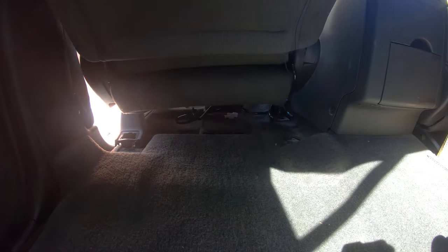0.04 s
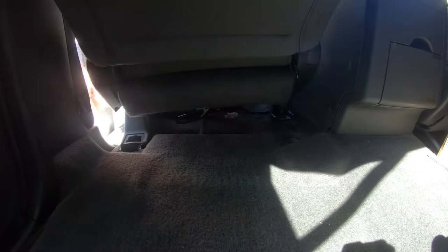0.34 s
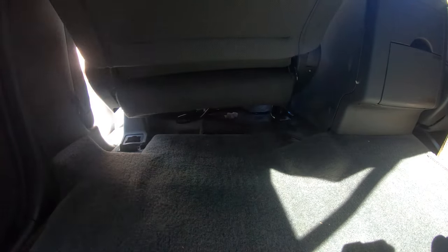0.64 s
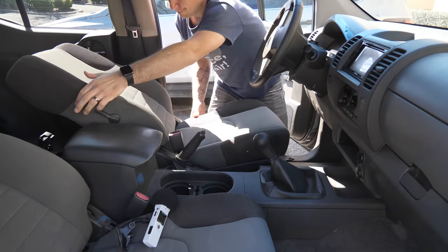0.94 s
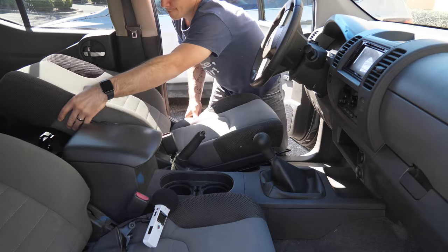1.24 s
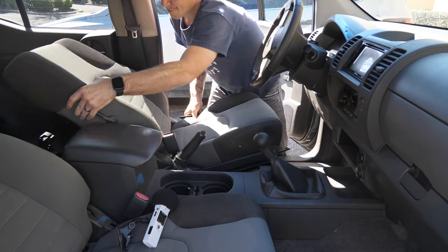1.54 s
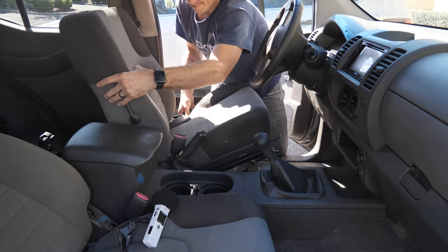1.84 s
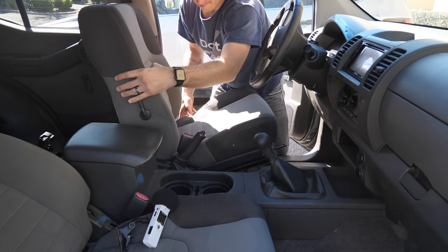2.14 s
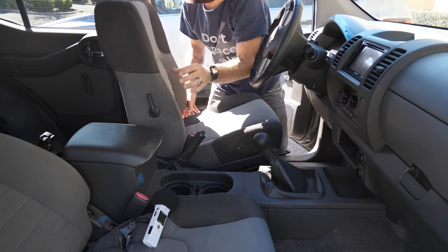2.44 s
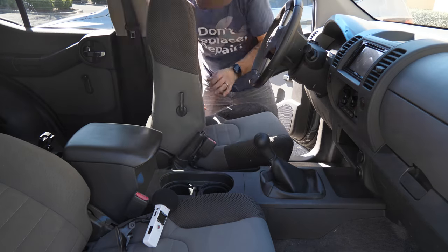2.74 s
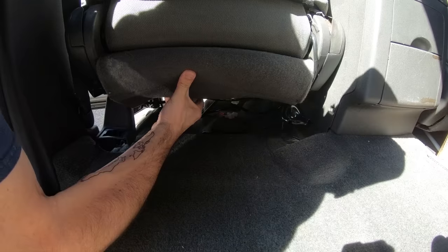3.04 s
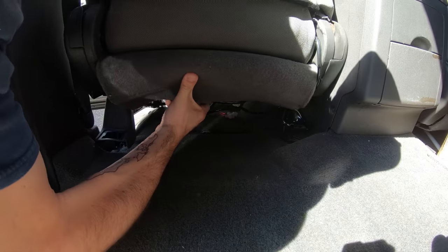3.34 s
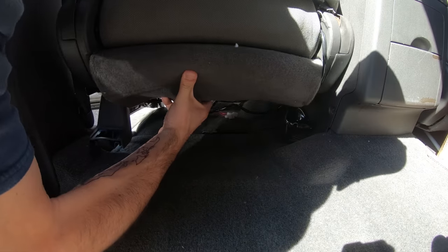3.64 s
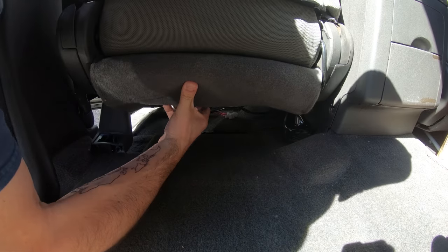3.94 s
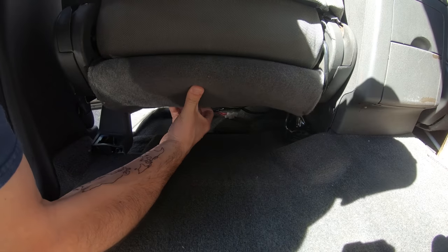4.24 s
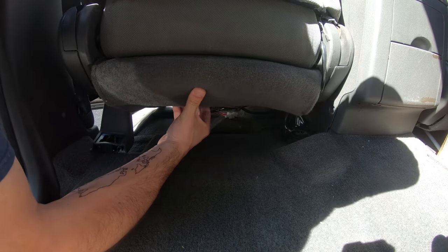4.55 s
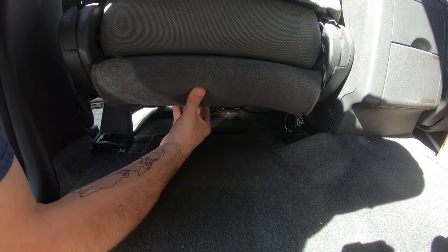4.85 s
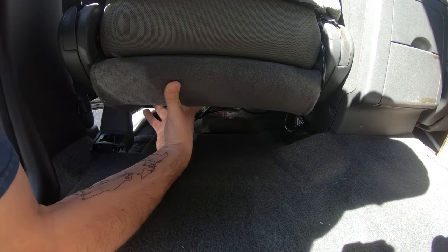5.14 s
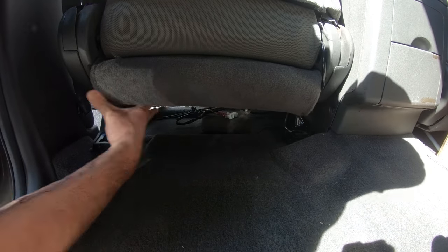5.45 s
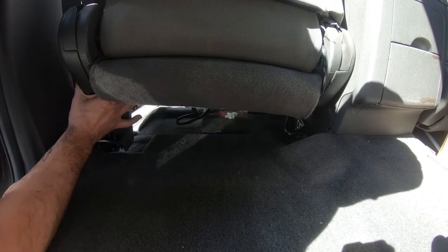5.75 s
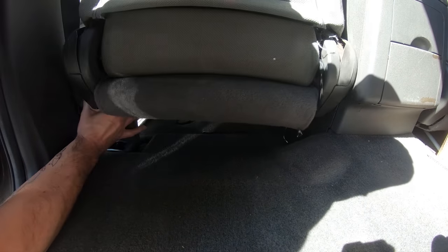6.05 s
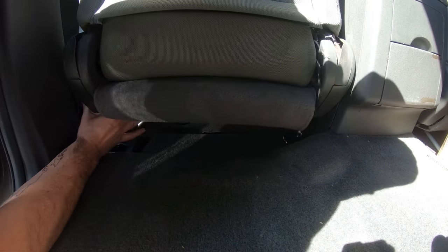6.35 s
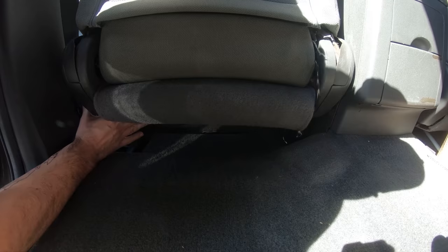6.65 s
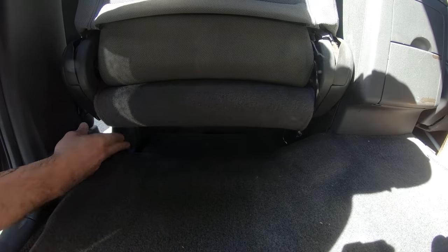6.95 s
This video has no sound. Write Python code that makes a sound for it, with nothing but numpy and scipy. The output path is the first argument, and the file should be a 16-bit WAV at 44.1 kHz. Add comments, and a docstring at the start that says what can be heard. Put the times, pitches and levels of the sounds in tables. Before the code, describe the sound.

A car seat knocks and thumps irregularly with rustling upholstery, then scrapes along its rail and stops with a loud metallic squeal.

```python
"""A car seat knocks on its floor rails as it is rocked and shoved into place, heard inside the parked car.
Impacts excite the resonances of the steel frame, and pushes on the floor set the cabin's air modes booming.
Stick-slip friction makes the seat judder along its rail and stop with a ringing squeal that overloads the
microphone. Upholstery rustles and groans once under a hand; the street murmurs through the open door."""
import sys
import numpy as np
from scipy import signal
from scipy.fft import rfft, irfft, next_fast_len
from scipy.io import wavfile
from scipy.ndimage import uniform_filter1d

SR = 44100
rng = np.random.default_rng(int(sys.argv[2]) if len(sys.argv) > 2 else 0)


def unload_audio(sound):
    """Save the sound as a 16-bit wav file, at the path given as the first command line argument."""
    columns = np.transpose(np.atleast_2d(sound))
    # keep every value between -1 and 1, then stretch to whole-number steps
    steps = np.round(np.clip(columns, -1, 1) * 32767)
    wavfile.write(sys.argv[1], SR, steps.astype(np.int16))


N = 312678
TIME = np.arange(N) / SR


# impacts: t/s, level/dB, hardness (0 padded, 1 bare steel), seat pan f/Hz, clack f/Hz, chatter length/s
IMPACTS = [(0.163, -32, 0.18, 305, 1300, 0.019), (0.279, -24.5, 0.37, 557, 1360, 0.019),
           (0.423, -37.5, 0.84, 310, 2090, 0.012), (0.461, -36.5, 0.7, 287, 1990, 0.018),
           (0.686, -39, 0.26, 620, 1300, 0.011), (0.881, -35.5, 0.65, 1700, 1730, 0.023),
           (0.927, -33, 0.68, 1590, 1760, 0.013), (1.223, -26, 1, 513, 1240, 0.011),
           (1.461, -31.5, 0.47, 670, 1500, 0.016), (1.538, -21, 0.35, 224, 1880, 0.016),
           (1.67, -25.5, 0.08, 294, 1280, 0.015), (1.688, -16.5, 0.1, 292, 2090, 0.013),
           (1.783, -16.5, 0.53, 825, 2690, 0.014), (1.976, -26.5, 0.93, 990, 2750, 0.017),
           (2.706, -43.5, 0.86, 360, 2070, 0.014), (2.745, -14, 0.032, 303, 1240, 0.011),
           (2.825, -18, 0.87, 455, 3120, 0.029), (3.167, -24, 0.04, 225, 1100, 0.014),
           (4.092, -50.5, 1, 436, 2700, 0.001), (4.165, -38.5, 0.05, 495, 1300, 0.015),
           (4.471, -32.5, 0.43, 220, 1300, 0.013), (4.528, -16, 0.08, 430, 1480, 0.0079),
           (4.54, -17, 0.15, 616, 1400, 0.011), (4.972, -41.5, 0.58, 342, 2260, 0.01),
           (5.057, -32, 0.78, 875, 2480, 0.0054)]
# spectra of the seat pan's thud, the frame's clack and the edges' tick: f/Hz, level/dB
THUD_SPECTRUM = [(50, -38), (110, 2), (220, -3.5), (450, -2), (850, -3.5), (1200, -10), (1800, -27),
                 (4000, -47)]
CLACK_SPECTRUM = [(600, -22), (1200, 4), (1900, 5), (2900, 1), (3600, -3.5), (5000, -12), (8000, -29)]
TICK_SPECTRUM = [(2500, -1), (4800, 3), (7000, -6), (11000, -9.5), (15500, -35)]

def knocks():
    """Impact excitation: the harder the contact, the more clack and tick join the seat pan's thud."""
    out = np.zeros((2, N))
    for start, db, hardness, pan_hz, clack_hz, chatter_s in IMPACTS:
        padding = np.clip(1 - hardness, 0, 1)
        clack_db = -0.5 - 19.5 * padding ** 1.55
        tick_db = -2 - 41 * padding
        thud = struck_part(THUD_SPECTRUM, pan_hz, chatter_s, lift_db=11, t60=0.12, per_s=5000)
        clack = struck_part(CLACK_SPECTRUM, clack_hz, chatter_s, lift_db=10, t60=0.083, per_s=5000)
        tick = struck_part(TICK_SPECTRUM, 12200, 0.87 * chatter_s, lift_db=1.5, t60=0.063, per_s=3500)
        add(out, start, amp(db) * (thud + amp(clack_db) * clack + amp(tick_db) * tick))
    return out


def struck_part(spectrum, peak_hz, chatter_s, lift_db, t60, per_s, rise_s=0.0018, peak_octaves=0.14):
    """Damped response of a resonant part to a chatter of contacts; rms 1 over its first 20 ms."""
    def colour_db(hz):
        detuning = np.log2((hz + 1) / peak_hz) / peak_octaves
        return read(spectrum, hz) + frame_db(hz) + lift_db / (1 + detuning ** 2)
    t = np.arange(16384) / SR
    attack = 1 - np.exp(-t / rise_s)
    decay = amp(-60 * np.maximum(t - chatter_s, 0) / t60)
    cabin_tail = amp(-30 - 60 * t / 0.54)
    sound = stereo(grains(len(t), per_s, spread_db=0.5), colour_db) * attack * (decay + cabin_tail)
    return sound / np.sqrt(np.mean(sound[:, :SR // 50] ** 2))


# resonances of the seat frame: f/Hz, bandwidth/Hz, lift/dB
FRAME_MODES = [(220, 19, 8.5), (326, 25, 5), (443, 27, 5.5), (616, 22, 3.5), (860, 35, 0), (1104, 97, 4.5),
               (1470, 120, 1.5), (2040, 113, 0.5), (2720, 60, -1), (3270, 170, 2.5), (4700, 380, 1)]

def frame_db(hz):
    """Resonance: each mode of the frame shapes the spectrum in a band about its natural frequency."""
    return sum(db / (1 + (2 * (hz - f) / width) ** 2) for f, width, db in FRAME_MODES)


# weight landing on the floor: t/s, relative level/dB, push length/s
FLOOR_PUSHES = [(0.399, -24, 0.0093), (0.477, -21.5, 0.014), (0.74, -30.5, 0.017), (1.492, -20.5, 0.015),
                (1.547, -17.5, 0.0076), (2.774, -24, 0.0098), (2.832, -14, 0.0058), (3.375, -16.5, 0.017),
                (3.406, -16, 0.02), (3.637, -24, 0.016), (3.883, -26.5, 0.012), (4.366, -25, 0.011),
                (4.469, -20, 0.0077), (4.538, -12, 0.0082), (4.774, -24.5, 0.023), (5.761, -22, 0.014),
                (6.059, -11, 0.0046), (6.325, -27, 0.021)]
# air modes of the cabin: f/Hz, relative level/dB, reverberation time/s
CABIN_MODES = [(34.2, 5.5, 0.58), (53, -9.5, 0.6), (67.9, 1.5, 0.31), (89.4, 0.5, 0.23), (121, 3, 0.17)]

def cabin_booms(detune=0.041, phase_spread_rad=0.71):
    """Modal response: a push on the floor rings the cabin's air; a shorter push reaches higher modes."""
    out, t = np.zeros((2, N)), np.arange(SR) / SR
    for start, db, push_s in FLOOR_PUSHES:
        modes = np.zeros((2, SR))
        for hz, mode_db, t60 in CABIN_MODES:
            mode_hz = hz * (1 + detune * rng.standard_normal())
            phase = phase_spread_rad * rng.standard_normal((2, 1))
            modes += amp(mode_db - 60 * t / t60) * np.sin(2 * np.pi * mode_hz * t + phase)
        push = np.sin(np.pi * np.minimum(t / push_s, 1)) ** 2
        add(out, start, amp(db - 2) * signal.fftconvolve(modes, push[None] / push.sum(), axes=1))
    # the open door lets the slowest pressure swings escape
    door_leak = signal.butter(2, 22, "high", fs=SR, output="sos")
    return signal.sosfilt(door_leak, out) * pan(-2.6)


# shoves along the rail: t/s, length/s, top level/dB
RAIL_SHOVES = [(5.73, 0.077, -9.5), (6.006, 0.018, -9.5)]
# spectrum of the sliding runner: f/Hz, level/dB
JUDDER_SPECTRUM = [(80, -7.5), (260, -6.5), (380, -7), (460, 7.5), (560, -1), (800, -7), (1100, -15.5),
                   (1500, -22.5), (2600, -25.5), (3600, -42), (9000, -58.5)]

def judder(slips_per_s=78, slip_decay_cycles=0.83, growth_db=16.5):
    """Relaxation oscillation: the runner sticks and slips, and every slip shakes the seat pan."""
    slip_phase = cycles(slips_per_s, jitter=0.25, rate_hz=40) % 1
    slips = 0.55 + np.exp(-slip_phase / slip_decay_cycles)
    contacts = grains(N, 9000, spread_db=-0.5) * slips
    scrape = stereo(contacts, lambda hz: read(JUDDER_SPECTRUM, hz) + 0.5 * frame_db(hz))
    running_rms = np.sqrt(uniform_filter1d((scrape ** 2).mean(0), size=700) + 1e-6)
    speed = np.zeros(N)
    for start, length, db in RAIL_SHOVES:  # the runner breaks loose, gathers speed, then coasts to rest
        remaining = np.clip(1 - (TIME - start) / length, 0, 1)
        speed += amp(db - growth_db * remaining) * gate(start, length, attack_s=0.013, fall_db_per_s=306)
    return speed * scrape / running_rms


SQUEAL_HZ = 296.2
# steel rubbing steel, at the stop and as the seat springs back: t/s, length/s, level/dB
STEEL_RUBS = [(6.016, 0.045, -0.96), (6.17, 0.056, -30)]
# harmonics of the squeal: number, driven level/dB, ringing level/dB, driven left minus right/dB
SQUEAL_HARMONICS = [(1, -23, -56, 0), (2, -8, -34.5, 5), (3, -1.5, -29, 1), (4, -10, -28, -1.5),
                    (5, -10.5, -37.5, -4.5), (6, -19.5, -56, -1), (7, -26.5, -51, -2), (8, -29, -41, -2),
                    (9, -25.5, -44.5, -1), (10, -24, -50, 3), (11, -22.5, -54, -4), (12, -23.5, -49, -1),
                    (14, -29.5, -61, -2)]
# spectrum of the grit between the faces: f/Hz, level/dB
GRIT_SPECTRUM = [(100, -11), (350, 8), (1200, -0.5), (3300, -15), (5500, -10.5), (11000, -16.5),
                 (15500, -27)]

def squeal(ring_start_s=6.04, ring_t60=0.99, grit_db=-16.5):
    """Self-excited vibration: fast stick-slip locks onto a steel part, which then rings on unevenly."""
    driven_cycles = cycles(SQUEAL_HZ, jitter=0.01, rate_hz=86)
    free_cycles = cycles(SQUEAL_HZ, jitter=0.00498, rate_hz=25.5)
    force = sum(amp(db) * gate(start, length, attack_s=0.016, fall_db_per_s=557)
                for start, length, db in STEEL_RUBS)
    ring_age = np.maximum(TIME - ring_start_s, 0)
    ring = (1 - np.exp(-ring_age / 0.01)) * amp(-60 * ring_age / ring_t60)
    tone = np.zeros((2, N))
    for k, driven_db, ring_db, pan_db in SQUEAL_HARMONICS:
        # higher harmonics lock more loosely and differ more between left and right
        offset = rng.random() + 0.058 * np.log(k) * wander(41)
        offset = offset + 0.019 * k * rng.uniform(-0.35, 1, (2, 1))
        driven_gain = force * amp(driven_db + 1.25 * np.log(k) * wander(45))
        ring_gain = ring * amp(ring_db + 4 * wander(25))
        tone += pan(pan_db) * driven_gain * np.sin(2 * np.pi * (k * driven_cycles + offset))
        tone += ring_gain * np.sin(2 * np.pi * (k * free_cycles + offset))
    grit = stereo(grains(N, 9000, spread_db=-0.5), lambda hz: read(GRIT_SPECTRUM, hz))
    return tone + amp(grit_db) * force ** 1.24 * grit  # grit needs heavy pressure


def rebound(start_s=6.172, db=-29, swell_s=0.031, harmonic=4):
    """Single-mode vibration: as the seat springs back, the steel sings briefly on one harmonic."""
    age = np.maximum(TIME - start_s, 0) / swell_s
    swell = age ** 2 * np.exp(1 - age ** 2)
    return amp(db) * swell * np.sin(2 * np.pi * harmonic * SQUEAL_HZ * TIME)


# strokes over upholstery and carpet: start t/s, end t/s, pressure level/dB
CLOTH_STROKES = [(0.171, 0.337, -35.5), (0.313, 0.507, -36.5), (0.64, 0.808, -43), (1.285, 1.457, -45.5),
                 (1.453, 1.693, -35.5), (1.621, 1.855, -26.5), (1.844, 2.056, -36), (2.586, 2.725, -58),
                 (3.096, 3.232, -42.5), (3.222, 3.61, -32.5), (3.706, 3.877, -34.5), (4.191, 4.363, -38),
                 (4.436, 4.537, -35), (4.907, 5.22, -49), (5.174, 5.665, -53.5), (5.75, 5.999, -34)]
# spectra of the dull rub and the cloth's hiss: f/Hz, level/dB
RUB_SPECTRUM = [(40, 3.5), (120, 0), (280, 2.5), (480, -2.5), (800, -5.5), (1400, -14), (2300, -17.5),
                (4500, -39.5)]
HISS_SPECTRUM = [(500, -14), (1500, 9.5), (2500, 8), (4500, 4), (7000, -5.5), (12000, -4.5), (15500, -22)]

def rustle(touch_db=-56.5, pressed_hiss_db=-18.5, catch_db=1.23, rumble_db=-7):
    """Friction noise: fibres catch and release, giving a hiss, a rub in the frame and a floor rumble."""
    rub_gain = np.zeros(N)
    hiss_gain = amp(-47) * stroke_speed(2.511, 2.6)  # one weightless swish of fabric
    for start, end, pressure_db in CLOTH_STROKES:
        speed = stroke_speed(start, end)
        rub_gain += amp(pressure_db) * speed
        # cloth hisses under the lightest touch, and more with pressure
        hiss_gain += np.hypot(amp(touch_db), amp(pressure_db + pressed_hiss_db)) * speed
    rub = stereo(grains(N, 1500, spread_db=0), lambda hz: read(RUB_SPECTRUM, hz) + frame_db(hz))
    hiss = stereo(grains(N, 12000, spread_db=1), lambda hz: read(HISS_SPECTRUM, hz))
    floor_spectrum = [(30, 0), (70, 4), (130, -2.5), (260, -43)]  # f/Hz, level/dB
    rumble = stereo(rng.standard_normal((2, N)), lambda hz: read(floor_spectrum, hz))
    catching = amp(catch_db * wander(23))
    return (rub_gain * rub + hiss_gain * hiss) * catching + amp(rumble_db) * rub_gain * rumble


def stroke_speed(start, end):
    """Velocity profile of a stroke: it speeds up and slows in one arch."""
    progress = np.clip((TIME - start) / (end - start), 0, 1)
    return np.sqrt(2) * abs(np.sin(np.pi * progress)) ** 0.83


def groan(start_s=4.962, length_s=0.215, hz=155, sag_hz_per_s=255, attack_s=0.047, release_s=0.05):
    """Stick-slip on the cushion: a soft, nearly pure tone that sinks and fades as the hand slows."""
    t = np.clip(TIME - start_s, 0, length_s)
    phase = 2 * np.pi * np.cumsum(hz - sag_hz_per_s * t) / SR
    tone = np.sin(phase) + amp(-25) * (np.sin(2 * phase) + np.sin(3 * phase))
    envelope = np.minimum(t / attack_s, 1) * np.minimum((length_s - t) / release_s, 1)
    return np.sqrt(2) * amp(-23.5 - 63 * t) * envelope * tone * pan(-2.4)


# spectrum of the street through the open door: f/Hz, level/dB
STREET_SPECTRUM = [(15, -6), (33, 5.5), (65, 5.5), (110, -0.5), (170, -5), (260, -8), (480, -9.5),
                   (700, -7), (1000, -9.5), (1600, -22.5), (2800, -26.5), (6500, -40), (10000, -41),
                   (15500, -43)]

def street(db=-40.5, swell_db=1.42):
    """Ambient noise: a distant broadband wash whose level drifts a little."""
    gain = amp(db + swell_db * wander(2.5))
    return gain * stereo(rng.standard_normal((2, N)), lambda hz: read(STREET_SPECTRUM, hz))


# likeness of the sound at the two microphone ports: f/Hz, correlation
PORT_CORRELATION = [(30, 0.5), (65, 0.54), (150, 0.86), (500, 0.73), (1200, 1), (4000, 0.95), (6500, 0.63),
                    (10000, 0.27), (14000, 0)]
# balance between the ports: f/Hz, left minus right/dB
PORT_BALANCE = [(40, -1.6), (250, -1.8), (500, -1.1), (1000, -0.3), (2500, -0.19), (12000, 0.3)]

def stereo(pair, colour_db):
    """Partial coherence: two independent signals blend into a coloured left and right, rms 1."""
    size = pair.shape[1]
    hz = np.fft.rfftfreq(size, 1 / SR)
    first, second = rfft(pair)
    correlation = np.clip(read(PORT_CORRELATION, hz), -1, 1)
    mid, side = first * np.sqrt(1 + correlation), second * np.sqrt(1 - correlation)
    lean = amp(read(PORT_BALANCE, hz) / 2)
    spectra = np.array([(mid + side) * lean, (mid - side) / lean])
    return unit_rms(irfft(spectra * amp(colour_db(hz)), size))


def grains(size, per_s, spread_db):
    """Shot noise: two trains of tiny contacts of uneven strength."""
    strength = amp(spread_db * np.minimum(rng.exponential(1, size), 4))
    occurs = rng.random(size) < per_s / SR
    return unit_rms(rng.standard_normal((2, size)) * strength * occurs)


def wander(rate_hz, step=16):
    """Low-pass noise: a random drift of rms 1."""
    size = next_fast_len(N // step + 2)
    hz = np.fft.rfftfreq(size, step / SR)
    drift = irfft(rfft(rng.standard_normal(size)) / (1 + (hz / rate_hz) ** 4), size)
    return unit_rms(np.interp(np.arange(N) / step, np.arange(size), drift))


def cycles(hz, jitter, rate_hz):
    """Phase in cycles: the integral of a drifting frequency."""
    return np.cumsum(hz * (1 + jitter * wander(rate_hz))) / SR


def gate(start, length, attack_s, fall_db_per_s):
    """Envelope that swells, holds, then decays exponentially."""
    t = TIME - start
    return np.clip(t / attack_s, 0, 1) ** 2 * amp(-fall_db_per_s * np.maximum(t - length, 0))


def amp(db):
    """Decibels to amplitude ratio."""
    return 10 ** (np.asarray(db) / 20)


def pan(db):
    """Channel gains for a level difference, left minus right."""
    return amp([[db / 2], [-db / 2]])


def unit_rms(x):
    """Normalisation to rms 1."""
    return x / np.sqrt(np.mean(x ** 2) + 1e-20)


def read(points, hz):
    """Interpolation on a log-frequency axis."""
    f, value = np.transpose(points)
    return np.interp(np.log(hz + 1), np.log(f + 1), value)


def add(mix, start_s, sound):
    """Sums a sound into the mix from its start time."""
    part = mix[:, round(start_s * SR):][:, :sound.shape[-1]]
    part += sound[..., :part.shape[1]]


def scene():
    """Superposition: the pressures of all sources add in the cabin."""
    rocking = knocks() + cabin_booms() + rustle()
    shoving = judder() + squeal() + rebound()
    return rocking + shoving + groan() + street()


def record(dry, ceiling=0.98, cutoff_hz=15750):
    """Saturation flattens the loudest peaks; a low-pass filter then limits the band."""
    flattened = dry / (1 + (dry / ceiling) ** 8) ** (1 / 8)
    low_pass = signal.firwin(511, cutoff_hz, window=("kaiser", 9), fs=SR)
    return signal.oaconvolve(flattened, low_pass[None], "same", axes=1)


dry = scene()
out = record(dry)
unload_audio(out)
```